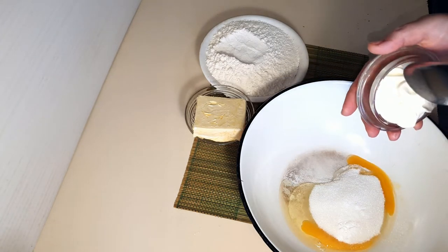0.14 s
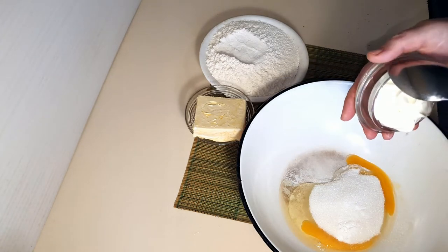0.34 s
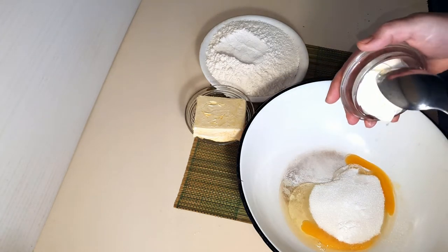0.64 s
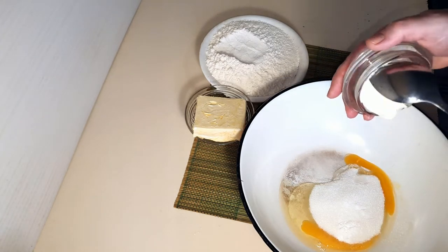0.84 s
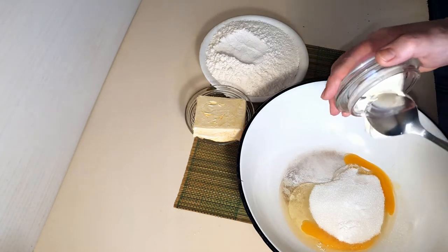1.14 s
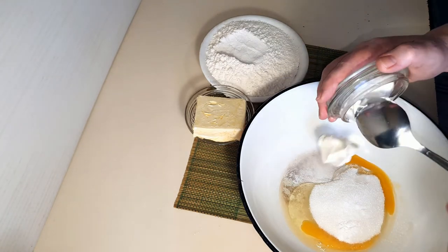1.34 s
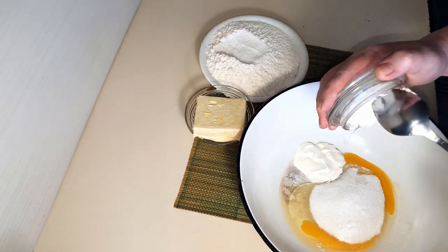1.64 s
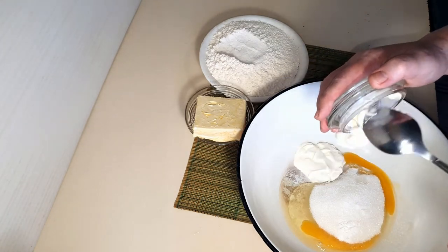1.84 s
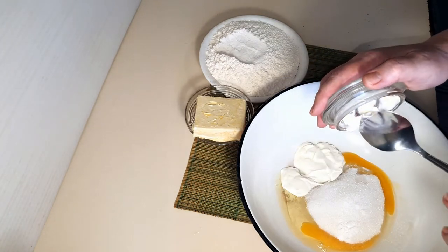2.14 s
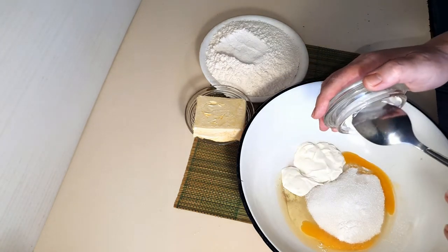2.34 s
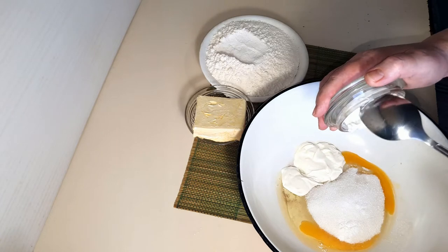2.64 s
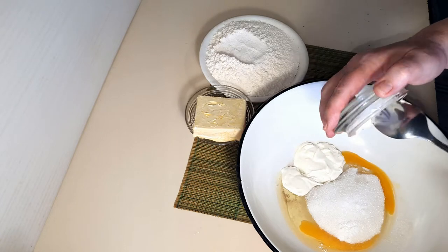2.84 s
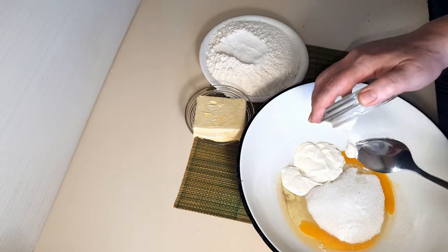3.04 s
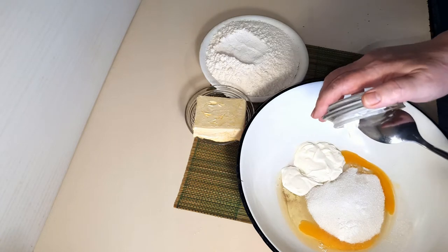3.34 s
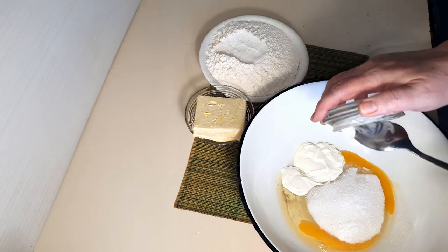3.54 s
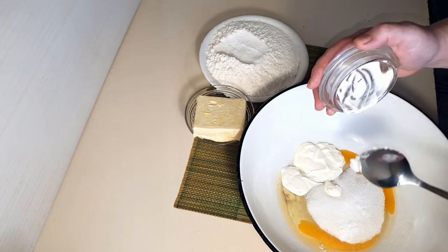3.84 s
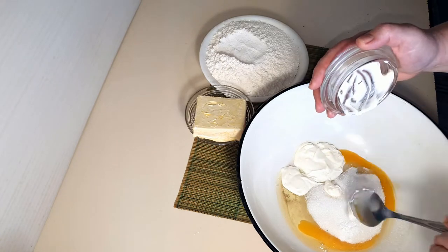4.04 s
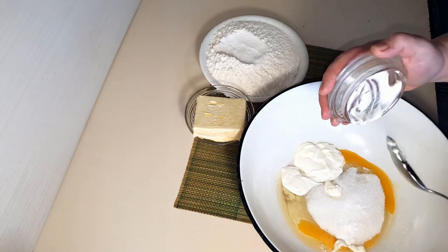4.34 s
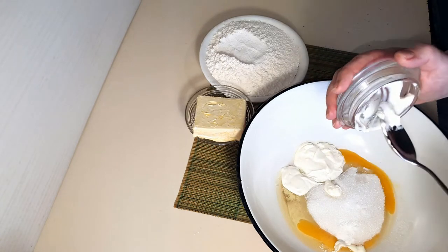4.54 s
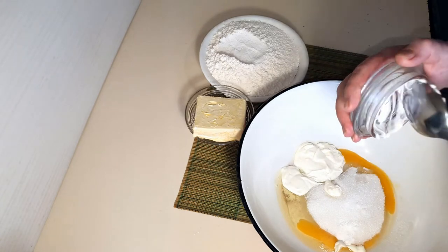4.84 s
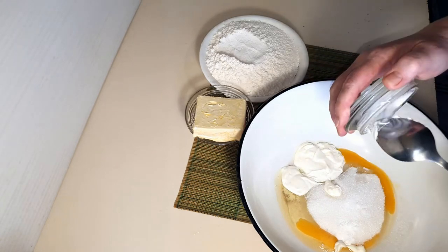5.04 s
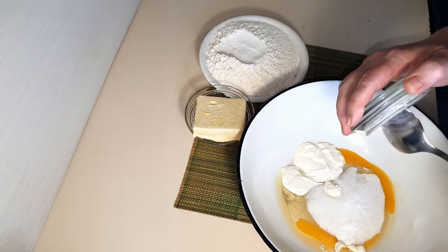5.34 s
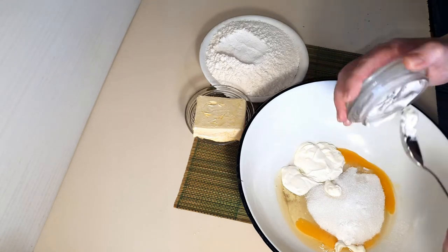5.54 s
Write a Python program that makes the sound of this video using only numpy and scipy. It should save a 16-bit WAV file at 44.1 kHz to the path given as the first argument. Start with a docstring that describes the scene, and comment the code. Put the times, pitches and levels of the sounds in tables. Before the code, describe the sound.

A close stereo pickup in a quiet, slightly reflective kitchen. A steel spoon works thick cream out of a small hand-held glass dish. Three quick taps at 0.2-0.4 s, the first strongest, then a fuller knock at 0.75 and barely audible scrapes around 0.9-1.05. At 1.33 cream lets go with a wet hollow pop and tick plus a soft low thud, followed by a clink at 1.4. A smaller smack and knock come at 1.6-1.67. Bright, hard clinks crowd 1.87-2.8, loudest at 2.06 and 2.39, with tiny squeaky ticks. Duller, weaker knocks fall at 3.3-3.5; faint thuds at 3.2 and 3.75, with a light tick at 3.7. A near-quiet gap follows. A double clink at 4.6 leads into short gritty scrapes until 4.95, with a knock at 4.87, then a clink and scratch at 5.13 and a faint last scrape at 5.46. Underneath, a faint low hum wavers, later throbbing about four times a second, with soft rumble and hiss.

```python
"""Spoon and cream in a quiet kitchen

A stereo microphone pair close to a small hand-held glass dish: a steel spoon scoops thick cream over a bowl.
Knocks ring damped modes of spoon and dish; scrapes drive them with uneven stick-slip force.
Cream smacks with a tick and a pop, and drops with soft low thuds. Filtered noise stands for the
reflections: bowl and counter at once, walls later. A wavering hum, a faint rumble and hiss lie underneath."""
import sys
import numpy as np
from scipy import signal
from scipy.fft import rfft, irfft, next_fast_len
from scipy.io import wavfile
from scipy.ndimage import uniform_filter1d

SR = 44100
rng = np.random.default_rng(int(sys.argv[2]) if len(sys.argv) > 2 else 0)


def log_audio(samples):
    """Write samples as a 16-bit WAV file to the path given in sys.argv[1]."""
    # one column per channel
    frames = np.atleast_2d(samples).T
    # limit to full scale, then quantise
    limited = np.clip(frames, -1, 1)
    pcm = np.round(limited * 32767).astype(np.int16)
    wavfile.write(sys.argv[1], SR, pcm)


N = 250865
T = np.arange(N) / SR
RING_T = T[:4096]  # time axis of one contact

# Level of the hum before its flutter and throb: (time [s], level [dB])
HUM_LEVEL = [(0, -57.5), (.42, -53.5), (.8, -67), (.92, -59.5), (1.4, -58.5), (1.6, -80), (1.75, -67.5),
             (2.5, -58), (2.72, -86), (2.84, -62), (3.1, -71.5), (3.22, -60.5), (4.07, -56), (4.45, -60.5),
             (5.69, -59.5)]
# Colour of the rumble: (frequency [Hz], level [dB])
RUMBLE_COLOUR = [(20, -5.5), (40, -7.5), (70, 9), (100, 3), (140, -0.5), (220, -9.5), (320, -17.5),
                 (500, -32.5), (900, -48)]
# Colour of the hiss: (frequency [Hz], level [dB])
HISS_COLOUR = [(20, 9.5), (300, 8.5), (600, 0), (1500, -5), (4000, -9), (10000, -13), (16000, -13)]
# Resonances of spoon and dish in contact, before each grip varies them and the hand shortens the longest:
# (frequency [Hz], level [dB], decay t60 [s])
BODY_MODES = [(937, -17.5, 0.043), (1620, -4.5, 0.11), (2060, -11, 0.084), (2427, 7, .05),
              (2790, -8, 0.032), (3130, -7, 0.025), (3300, -17.5, 0.03), (3963, 7, 0.21),
              (4192, 1.5, 0.033), (5260, -6, 0.1), (5814, -10, .05), (6150, -7, 0.19), (5990, 9, 0.025),
              (6130, -10.5, 0.13), (8450, -9, 0.055), (10030, -3, 0.057), (9815, -12.5, 0.021),
              (12170, -13.5, 0.054), (12500, -7, 0.01956), (15560, -16, .025)]
# Dry crack of a contact: (frequency [Hz], level [dB])
CRACK_COLOUR = [(100, -21), (280, -19), (480, -6), (640, -14.5), (850, -2), (1150, -3.5), (1500, 4.5),
                (3600, 9), (4700, 0.5), (6400, 2.5), (7600, -13), (11000, -9), (15000, -15), (16000, -20)]
# Edges of the colour bands of a knock, low, body, clink, ring, edge, air: (frequency [Hz])
BAND_EDGES_HZ = [300, 1300, 2400, 4700, 7500, 11500, 16000]
# How an untilted knock shares its energy among those bands: (level [dB])
KNOCK_BAND_DB = [-23.5, -10.5, -1.5, -4.5, -12, -17]
# Spoon landing on glass: (time [s], strength [dB], weight of the lows [dB per octave],
# brightness [dB per octave], lower note of the contact point [Hz], its upper note [Hz],
# level of the notes before the knock is coloured [dB])
KNOCKS = [(0.18, 0, 3.5, -2.5, 1948, 5985, -7), (0.2968, -6, 0, 6, 2420, 6250, -18),
          (0.3986, -12.5, 1, 6, 3460, 6020, -7), (0.721, -17, -5.5, -8, 2476, 5780, -6),
          (0.7562, 0.5, 3.5, -2.5, 1940, 6210, -8), (1.406, 1.5, 0.5, 1.5, 4010, 6700, -6),
          (1.6709, 1, -0.5, -3, 2740, 5950, -6), (1.8716, -4, 0, 3, 3850, 6250, -8),
          (1.9202, 3.5, 1, 1.2, 4010, 5420, -10.5), (2.062, 10, -3.5, -0.44, 3974, 6165, -19),
          (2.28, 1.2, 1, -0.5, 4080, 6020, -9), (2.386, 10.5, -2, 0.1, 3900, 6220, -21),
          (2.58, .5, -2.2, 3.5, 4390, 6890, -6.5), (2.634, 3, 0, -1.5, 4150, 5720, -7.5),
          (2.78, -4, -0.5, -4, 2425, 5486, -6), (3.3202, -19, 1, 3.5, 3040, 5100, -1.5),
          (3.3562, -6.5, 0.1, -1.8, 2813, 6590, -1), (3.448, -3, -5, -6.5, 3620, 6080, -6.5),
          (3.5182, -14.5, -4, -11, 2477, 6070, -3), (4.597, -1, 1, -0.5, 3840, 6600, -7),
          (4.616, 3, -0.7, 1.5, 4046, 6260, -3), (4.873, -2.5, -2.5, -1.5, 3063, 5650, -6.5),
          (5.129, 1.5, -0.9, 0.2, 4060, 6065, -4)]
# Reverberation of the kitchen: (frequency [Hz], decay t60 [s])
ROOM_T60 = [(200, 0.48), (600, 0.1376), (1500, 0.2933), (3500, 0.2874), (6500, 0.2469), (10000, 0.2543),
            (16000, 0.16)]
# Colour of its tail: (frequency [Hz], level [dB])
ROOM_COLOUR = [(200, -3), (600, 11.5), (1500, 0.35), (3500, -4), (6500, -2.44), (10000, -5.5),
               (16000, -2.5)]
# The dish is shifted between scoops: (time [s])
DISH_SHIFTS = [0, .6, 1.25, 1.83, 2.24, 2.55, 3.1, 4.4, 5.1]
# Spoon dragged over glass: (time [s], length [s], level [dB], relative spoon squeal [dB],
# relative chatter [dB], chatter pitch at mid-stroke [Hz])
SCRAPES = [(0.184, 0.012, -34, -7, -6, 2150), (0.292, 0.02, -34, -9, -10, 2390),
           (0.862, 0.038, -53, -21, 3, 1220), (0.994, 0.022, -47.5, -14, 9, 2383),
           (0.99, 0.067, -57, -5, 10.5, 1355), (1.061, 0.009, -52, -6.5, 7, 1930),
           (1.648, 0.011, -20, -4, -10.5, 1512), (2.014, 0.0062, -40, -19, 10, 2930),
           (2.061, 0.0041, -19, 18, -14, 2700), (2.094, 0.022, -37, 25, 10.5, 2670),
           (2.365, 0.016, -36, 15, -9.5, 3100), (3.317, 0.046, -47, -12, 10.5, 5370),
           (3.449, 0.027, -44.5, -11, 25, 1850), (4.638, 0.048, -37.5, 8, -17, 1600),
           (4.679, 0.063, -29.5, 2, -3.5, 1554), (4.786, 0.023, -33.5, -1, -2.5, 2940),
           (4.809, 0.046, -28, 4.5, -11.5, 1485), (4.854, 0.0311, -26.5, 1, 1, 2363),
           (4.916, 0.0056, -34, -2.5, -1.5, 1650), (5.114, 0.019, -33.5, 15.5, -16.5, 1660),
           (5.133, 0.057, -33.5, 0.5, -2.5, 3940), (5.192, 0.027, -35.5, 1.5, 1, 2505),
           (5.462, 0.035, -46.5, 17, -2.5, 1550)]
# Steel rubbing on glass: (frequency [Hz], level [dB])
RUB_COLOUR = [(150, -45), (350, -29), (520, -12.5), (640, -23.5), (900, -14.5), (1140, -18), (1450, -2),
              (2100, 3), (2600, 7), (3900, -1), (4900, -12), (6500, -12.5), (7500, -36.5), (16000, -36.5)]
# Cream dropping into the bowl and the dish being shaken: (time [s], length [s], level [dB])
THUDS = [(1.331, 0.16, -45.5), (1.92, 0.21, -49.5), (3.218, 0.21, -54), (3.763, 0.12, -53)]
# Wet cream letting go: (time [s], pop level [dB], cavity pitch [Hz], tick level [dB])
SMACKS = [(1.332, -33, 1740, -43.5), (1.334, -32, 1234, -48), (1.341, -31.5, 1167, -27),
          (1.610, -33, 1338, -25), (3.699, -66, 2410, -42.5)]

HUM_HZ, RUMBLE_DB, HISS_DB = 50.2, -69, -79
THROB_DIP_S, THROB_HZ, THROB_DEPTH = 2.17, 4.03, 0.49  # time of the first full dip, rate, share of level
PIVOT_HZ = 3120  # weight tilts a knock below this, brightness above
LONGEST_RING_T60, CHATTER_T60, SQUEAL_T60 = .1, .05, .04  # seconds
LEFT_LAG = 6  # samples by which the direct sound reaches the left later
SWELL_SHARE = .3  # pressure peaks early in a stroke
SLIPS_PER_S = 700
GLIDE_PER_S = 2.2  # chatter rises by this share of its pitch each second as the contact moves
# Grit in a firm stroke, lost per dB of stroke below FIRM_DB, gained per dB of squeal (bare steel on glass)
FIRM_DB, GRIT_DB, GRIT_PER_DB, GRIT_PER_SQUEAL = -37, -13, 1.3, 1
THUD_HZ = 55
TOP_HZ = 15850


def undb(db):
    """Decibels to gain."""
    return 10 ** (np.asarray(db) / 20)


def unit(x):
    """Scale to unit energy along the last axis."""
    return x / np.sqrt(np.sum(x ** 2, axis=-1, keepdims=True) + 1e-18)


def on_log(hz, points):
    """Read (frequency [Hz], value) points on a log-frequency axis."""
    f, value = np.transpose(points)
    return np.interp(np.log(hz + 1), np.log(f), value)


def colour(x, points):
    """Causal minimum-phase filter through (frequency [Hz], level [dB]) points."""
    size = 2 * next_fast_len(x.shape[-1] // 2 + SR // 100, real=True)
    hz = np.arange(size // 2 + 1) * SR / size
    cepstrum = irfft(np.log(undb(on_log(hz, points))))
    # folding the cepstrum onto positive time makes the filter causal
    cepstrum[1:size // 2] *= 2
    cepstrum[size // 2 + 1:] = 0
    response = np.exp(rfft(cepstrum))
    return irfft(rfft(x, size) * response)[..., :x.shape[-1]]


def fade(t, t60):
    """Exponential decay, 60 dB down after t60 seconds."""
    return np.exp(-np.log(1000) * t / t60)


def mode(t, hz, t60):
    """One struck resonance: a decaying sine of unit energy."""
    return unit(np.sin(2 * np.pi * hz * t) * fade(t, t60))


def walk(count):
    """Smooth random wander through count fresh points a second."""
    k = SR // count
    points = rng.standard_normal(N // k + 2)
    line = np.interp(np.arange(N) / k, np.arange(N // k + 2), points)
    return uniform_filter1d(line, k // 2)


def add(out, x, s):
    """Mix x in at time s."""
    i = int(s * SR)
    out[:, i:i + x.shape[-1]] += x[:, :N - i]


def background(waver_hz=2.2, flutter_db=1.8, side_db=-10, left_db=1.05):
    """A low hum wavers in pitch and level and later throbs, over steady rumble and hiss of filtered noise."""
    hum_hz = HUM_HZ + waver_hz * walk(count=12)
    tone = np.sqrt(2) * np.sin(2 * np.pi * np.cumsum(hum_hz) / SR)
    cycles = (T - THROB_DIP_S) * THROB_HZ
    onset = np.clip(2 * cycles + 1, 0, 1)  # throb grows in over the half cycle before its first full dip
    throb = 1 - THROB_DEPTH * onset * np.cos(2 * np.pi * cycles)
    hum_db = np.interp(T, *np.transpose(HUM_LEVEL)) + flutter_db * walk(count=12)
    # mostly common to both sides, with a little of its own on each
    rumble_noise = rng.standard_normal(N) + undb(side_db) * rng.standard_normal((2, N))
    rumble = unit(colour(rumble_noise, RUMBLE_COLOUR)) * np.sqrt(N)
    hiss = unit(colour(rng.standard_normal((2, N)), HISS_COLOUR)) * np.sqrt(N)
    bass = tone * throb * undb(hum_db) + rumble * undb(RUMBLE_DB)
    return bass * undb([[left_db], [-left_db]]) + undb(HISS_DB) * hiss


def body(crack_t60, crack_db=5, scatter_db=6.0, detune=0.014, spread=0.92):
    """Spoon and dish ring and crack towards each microphone; every grip weights, detunes and aims the modes."""
    hz, db, t60 = np.transpose(BODY_MODES)
    weight, shift, side, *aim = rng.standard_normal((len(hz), 5)).T
    grip_hz = hz * (1 + detune * shift)
    grip_t60 = np.minimum(t60, LONGEST_RING_T60)  # the hand damps them
    modes = mode(RING_T, grip_hz[:, None], grip_t60[:, None])
    direction = np.sign(side) + spread * np.array(aim)
    ring = (direction * undb(db + scatter_db * weight)) @ modes
    noise = rng.standard_normal(len(RING_T)) + spread * rng.standard_normal((2, len(RING_T)))
    crack = colour(noise * fade(RING_T, crack_t60), CRACK_COLOUR)
    return unit(unit(ring) + undb(crack_db) * unit(crack))


def knocks(crack_t60=0.048, note_t60=0.039, upper_db=-3, contact_s=.0008):
    """Each knock rings the body with its own strength, two notes and tilt of colour."""
    out, edges, t = np.zeros((2, N)), np.array(BAND_EDGES_HZ), RING_T
    centres = np.sqrt(edges[1:] * edges[:-1])
    octaves = np.log2(centres / PIVOT_HZ)
    cushion = 1 - np.exp(-(t / contact_s) ** 2)  # a film of cream softens the contact
    for s, db, weight, brightness, lower_hz, upper_hz, note_db in KNOCKS:
        notes = mode(t, lower_hz, note_t60) + undb(upper_db) * mode(t, upper_hz, note_t60)
        x = (body(crack_t60) + undb(note_db) * notes) * cushion
        tilt_db = np.where(octaves < 0, weight, brightness) * np.abs(octaves)
        band_db = np.array(KNOCK_BAND_DB) + tilt_db
        for _ in range(2):  # a second pass brings the bands closer to their shares
            power = np.sum(np.abs(rfft(x)) ** 2, axis=0) / len(t)
            own_db = 10 * np.log10(np.add.reduceat(power, edges * len(t) // SR)[:-1])
            x = colour(x, np.column_stack([centres, band_db - own_db]))
        add(out, undb(db) * x, s)
    return out


def kitchen(x, near_db=-7, near_t60=0.093, room_db=-7, build_s=0.015, left_db=1):
    """Direct sound reaches the right first, a little louder on the left; bowl and counter answer, then walls."""
    t = T[:SR // 2]
    hz = np.fft.rfftfreq(len(t), 1 / SR)
    noise = rfft(rng.standard_normal((2, len(t))))
    bands = np.array(ROOM_T60)
    tail = np.zeros((2, len(t)))
    for share, t60 in zip(np.eye(len(bands)), bands[:, 1]):  # overlapping bands, each with its own decay
        window = on_log(hz, np.column_stack([bands[:, 0], share]))
        tail += irfft(noise * window, len(t)) * fade(t, t60)
    build = 1 - np.exp(-(t / build_s) ** 2)
    tail = colour(unit(tail * build), ROOM_COLOUR)
    sparse = rng.standard_normal((2, len(t))) ** 3  # cubing lets a few reflections stand out
    near = unit(sparse * fade(t, near_t60) * (t > .001))
    response = undb(room_db) * tail + undb(near_db) * near
    response[0, LEFT_LAG] += 1
    response[1, 0] += 1
    return signal.fftconvolve(x, response, axes=1) * undb([[left_db], [-left_db]])


def scrapes(squeal_hz=6170, split_hz=80, grip=0.78, rub_t60=.012, slip_db=4, drag_db=-9, dish_db=-3):
    """The edge sticks and slips; uneven slips ring dish and spoon. Firm strokes are gritty, light ones chatter."""
    out, t = np.zeros((2, N)), RING_T
    for s, length, db, squeal_db, chatter_db, chatter_hz in SCRAPES:
        pressure = np.interp(t / length, [0, SWELL_SHARE, 1], [0, 1, 0]) ** grip
        grit_db = GRIT_DB + GRIT_PER_DB * min(db - FIRM_DB, 0) + GRIT_PER_SQUEAL * squeal_db
        slip_times = rng.random(len(t)) < SLIPS_PER_S / SR
        slips = slip_times * undb(slip_db * rng.standard_normal(len(t)))
        drag = rng.standard_normal(len(t))
        force = pressure * (unit(slips) + undb(drag_db) * unit(drag))

        dish = body(crack_t60=0.14, crack_db=-1.5)
        rub_noise = rng.standard_normal((2, len(t))) * fade(t, rub_t60)
        responses = [colour(rub_noise, RUB_COLOUR),
                     colour(dish, [(4000, 0), (9000, -12.0)]),  # ring
                     colour(dish, [(6000, -38.0), (9000, -6.5)]),  # grit, the top of the same ring
                     sum(mode(t, squeal_hz + side * split_hz, SQUEAL_T60) for side in (-1, 1)),
                     mode(t, chatter_hz, CHATTER_T60)]
        rub, ring, grit, squeal, chatter = (
            unit(signal.fftconvolve(force[None], np.atleast_2d(r), axes=1)) for r in responses)

        # shift the chatter's frequency from below its pitch to above it over the stroke
        from_middle = np.minimum(T[:chatter.shape[1]], length) - length / 2
        glide_hz = chatter_hz * GLIDE_PER_S * from_middle
        chatter = np.real(signal.hilbert(chatter) * np.exp(2j * np.pi * np.cumsum(glide_hz) / SR))
        tones = undb(grit_db) * grit + undb(squeal_db) * squeal + undb(chatter_db) * chatter
        x = unit(rub + undb(dish_db) * ring) + tones / 2
        add(out, unit(x) * undb(db) * np.sqrt(np.sum(pressure ** 2)), s)
    return out


def thuds(rise_share=.35, rumble_db=-8, left_db=.8):
    """A soft push swells and dies away: one low note in a dull rumble."""
    out, t = np.zeros((2, N)), T[:SR // 2]
    for s, length, db in THUDS:
        push = np.interp(t / length, [0, rise_share, 1], [0, 1, 0]) ** .5
        rumble = unit(colour(rng.standard_normal(len(t)), RUMBLE_COLOUR)) * np.sqrt(len(t))
        note = np.sqrt(2) * np.sin(2 * np.pi * THUD_HZ * t)
        x = note + undb(rumble_db) * rumble
        add(out, x * push * undb(db) * undb([[left_db], [-left_db]]), s)
    return out


def smacks(pop_t60=0.072, tick_t60=0.07):
    """A film of cream snaps with a tick and the air pocket behind it pops."""
    out, t = np.zeros((2, N)), T[:SR // 10]
    tick_colour = [(300, -17), (1500, 2.5), (6000, 2.5), (9000, -0.5), (16000, -11)]  # (Hz, dB)
    for s, pop_db, hz, tick_db in SMACKS:
        tick = colour(rng.standard_normal((2, len(t))) * fade(t, tick_t60), tick_colour)
        pop = mode(t, hz, pop_t60)
        add(out, undb(pop_db) * pop + undb(tick_db) * unit(tick), s)
    return out


def scene():
    """Spoon work over the background; each new position of the dish meets another pattern of reflections."""
    spoon = knocks() + scrapes() + smacks()
    out = np.zeros((2, N))
    for start, end in zip(DISH_SHIFTS, DISH_SHIFTS[1:] + [N / SR]):
        add(out, kitchen(spoon[:, int(start * SR):int(end * SR)]), start)
    return out + background() + thuds()


def record(dry):
    """The recorder cuts the top with a steep low-pass filter."""
    low_pass = signal.ellip(8, .2, 70, TOP_HZ, fs=SR, output="sos")
    return signal.sosfilt(low_pass, dry)


dry = scene()
out = record(dry)
log_audio(out)
```